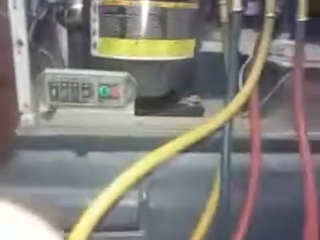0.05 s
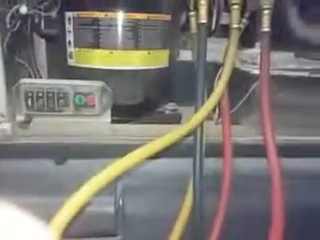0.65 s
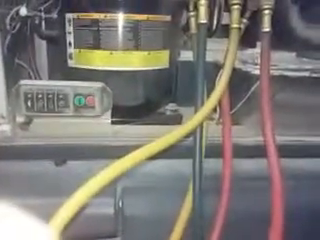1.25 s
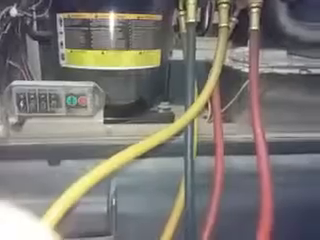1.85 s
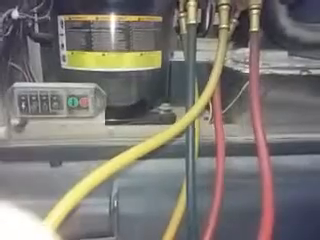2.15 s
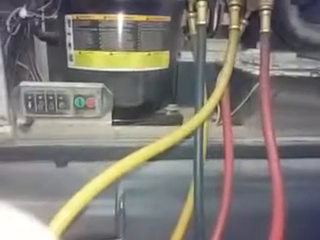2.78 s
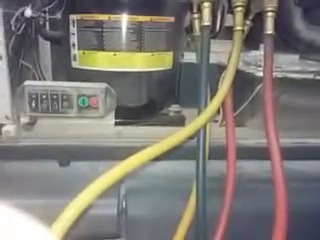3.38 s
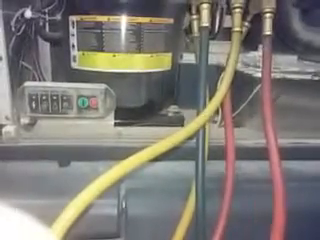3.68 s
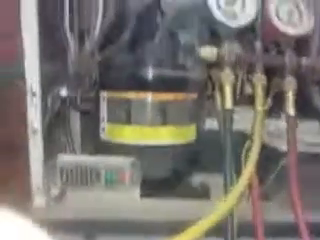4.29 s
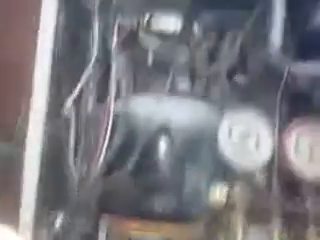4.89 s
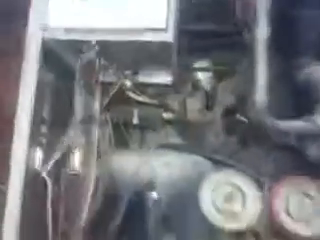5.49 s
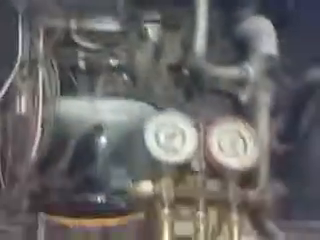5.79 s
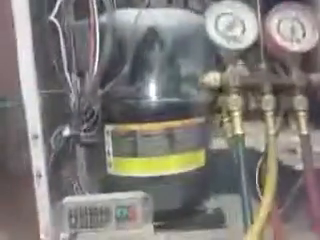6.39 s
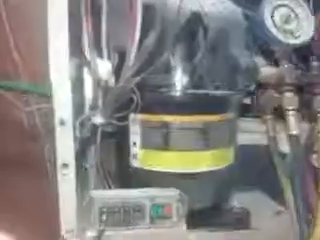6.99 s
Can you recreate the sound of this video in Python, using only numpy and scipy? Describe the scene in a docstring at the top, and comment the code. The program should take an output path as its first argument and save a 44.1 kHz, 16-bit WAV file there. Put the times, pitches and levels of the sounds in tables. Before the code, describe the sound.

A refrigeration compressor whines steadily over a humming, rushing fan, while gusts of air buffet the close microphone, hardest in the second half.

```python
"""A refrigeration unit runs with its service panel off, close to a hand-held microphone. From the start
the compressor whines on multiples of its shaft speed and the condenser fan hums and rushes. The
microphone drops from the top to the base by 0.6 s, and moving air buffets it. At 4.1 s it is lifted
to the top again: the gusts hit hardest and a limiter ducks under them. From 5 to 6 s the main whine
fades as the microphone points over the compressor; near 5.9 and 7.1 s an airy fan whistle swells."""
import sys
import numpy as np
from scipy import signal
from scipy.fft import rfft, irfft
from scipy.io import wavfile
from scipy.ndimage import uniform_filter1d, minimum_filter1d, map_coordinates

SR = 44100
rng = np.random.default_rng(int(sys.argv[2]) if len(sys.argv) > 2 else 0)


def store_pcm(level_fs):
    """Save levels as 16-bit WAV."""
    pcm = np.round(np.clip(level_fs, -1, 1) * 32767).astype(np.int16)
    wavfile.write(sys.argv[1], SR, np.atleast_2d(pcm).T)


N = 319725
TIME = np.arange(N) / SR
FREQS = np.maximum(np.fft.rfftfreq(N, 1 / SR), 1)
SHAFT_HZ, CUTOFF_HZ = 49.135, 15750


# Main whine, fading while the microphone points over the compressor: time_s, level_db
MAIN_WHINE = [(0, -42), (.6, -38), (2.2, -39.5), (4.4, -37), (5.1, -49), (6.1, -51), (6.4, -38.5),
              (6.85, -42), (7.25, -54)]
# Higher whines, each beamed its own way: shaft_order, base_db, top_db
HIGH_WHINES = [(60, -56, -44.5), (75, -47, -53), (77, -51, -53), (88, -50.5, -63)]
# Standing-wave crests the microphone crosses: time_s, shaft_order, rise_db
CRESTS = [(.35, 60, 6), (.5, 75, 9), (1.65, 77, 7), (2.85, 77, 7.5), (4.3, 60, 4), (4.65, 77, 12.5),
          (5.65, 60, 3.5), (5.75, 77, 8), (6.38, 77, 14), (7.05, 60, 4.5)]

def compressor_whine(turns, height, main_order=24, fade_db=1.1, crest_width_s=0.19):
    """The loudest shaft multiples; the level of each depends on where the microphone is."""
    out = from_db(in_time(MAIN_WHINE)) * tone(main_order * turns)
    for order, base_db, top_db in HIGH_WHINES:
        db = base_db + (top_db - base_db) * height + fade_db * drift(4.12)
        for time_s, crest_order, rise_db in CRESTS:
            if crest_order == order:
                db += rise_db * np.exp(-((TIME - time_s) / crest_width_s) ** 2)
        out += from_db(db) * tone(order * turns)
    return out


def shaft_turns(speed_wobble=0.0002915):
    """Running turn count of the compressor shaft, whose speed barely wavers under load."""
    return np.cumsum(SHAFT_HZ * (1 + speed_wobble * drift(4.904))) / SR


# Other clear shaft multiples: shaft_order, level_db
SHAFT_TONES = [(1, -55), (8, -48.5), (9, -44), (11, -54), (14, -54), (26, -51.5), (30, -73), (31, -49.5),
               (35, -55), (36, -69), (40, -55.5), (64, -73), (65, -50.5), (66, -50.5), (78, -55), (81, -57)]

def compressor_tones(turns, fade_db=2):
    """Quieter tones locked to the shaft, each fading in and out."""
    return sum(from_db(db + fade_db * drift(3.41)) * tone(order * turns) for order, db in SHAFT_TONES)


# Shell buzz, a dense comb of weak shaft multiples: frequency_hz, level_per_multiple_db
BUZZ_SPECTRUM = [(500, -69.5), (1400, -65), (2300, -77.5), (3300, -55.5), (4200, -66), (5200, -73.5),
                 (7600, -96), (8600, -82.5), (10200, -88.5), (11000, -91), (13300, -88), (14000, -102)]

def shell_buzz(turns, paths=4, turn_samples=8192):
    """The same rattle every turn, arriving by several paths whose shares shift as the hand moves."""
    orders = np.arange(1, CUTOFF_HZ // SHAFT_HZ)
    gains = gain_at(BUZZ_SPECTRUM, orders * SHAFT_HZ)
    out = np.zeros(N)
    for _ in range(paths):
        real, imag = rng.standard_normal((2, len(orders)))
        one_turn = irfft(np.r_[0, (real + 1j * imag) * gains], turn_samples) * turn_samples / 2
        out += drift(1.392) * np.interp(turns % 1 * turn_samples, np.arange(turn_samples), one_turn)
    return out / np.sqrt(paths)


# Fan and motor tones: pitch_hz, level_db
HUM_TONES = [(75.2, -36.5), (115, -38.5), (161.5, -36), (184.5, -41.5), (230.5, -41.5), (449, -49),
             (605, -53.5), (775, -60)]

def fan_hum(speed_wobble=0.00277, waver_db=4.0):
    """Low tones that waver in the uneven inflow."""
    clock_s = np.cumsum(1 + speed_wobble * drift(4)) / SR
    return sum(from_db(db + waver_db * drift(7)) * tone(hz * clock_s) for hz, db in HUM_TONES)


# Air through the coil: frequency_hz, density_db
RUSH_SPECTRUM = [(60, -57), (480, -60.5), (720, -64.5), (1050, -64), (1550, -66.5), (2350, -70),
                 (3250, -66), (4050, -71.5), (4600, -80), (5100, -84.5), (7700, -98.5), (9300, -98),
                 (11000, -101.5), (15700, -104)]
# Cabinet and pipe resonances: pitch_hz, width_hz, relative_db
CABINET_MODES = [(439, 20, -48), (500, 52, -41.5), (1006, 13, -45.5), (1068, 10, -40.5), (1290, 21, -48),
                 (1474, 19, -48.5), (2567, 18, -50.5), (5920, 250, -63), (8600, 250, -70),
                 (10250, 250, -74), (13300, 200, -77)]
# Fan whistle, heard only in some spots: time_s, level_db
WHISTLE_LEVEL = [(0, -44.5), (3.2, -48), (4.5, -57), (5.65, -44), (5.9, -34.5), (6.15, -46), (6.92, -46),
                 (7.07, -34), (7.25, -39)]

def air_rush(height, flicker_db=0.58, cabinet_db=-1, top_db=-1):
    """Air rushes through the coil, rings the cabinet (less near the top) and whistles at the fan."""
    rush = noise(RUSH_SPECTRUM) * from_db(flicker_db * drift(25))
    cabinet = sum(from_db(db) * resonance(hz, width_hz) for hz, width_hz, db in CABINET_MODES)
    whistle = from_db(in_time(WHISTLE_LEVEL)) * resonance(pitch_hz=1341, width_hz=8)
    return rush + cabinet * from_db(cabinet_db + top_db * height) + whistle


def panel_edge(direct, height, base_lag_s=0.00032, extra_lag_s=0.00039, base_share=0.27, dull_hz=6500):
    """The opening's edge adds an inverted echo; lifting delays and fades it, so notches sweep down."""
    dulled = irfft(rfft(direct) / (1 + (FREQS / dull_hz) ** 4), N)
    echo = np.interp(TIME - base_lag_s - extra_lag_s * height, TIME, dulled)
    return direct - base_share * (1 - height ** 4) * echo


# Buffeting rumble: frequency_hz, relative_db
BUFFET_SPECTRUM = [(12, -10), (25, -19), (45, -10.5), (75, 2.5), (130, 2), (190, -1), (270, -10.5),
                   (400, -21.5), (700, -32.5), (1500, -72)]
# Flutter of strong gusts: frequency_hz, relative_db
FLUTTER_SPECTRUM = [(100, 5.5), (200, -0.5), (305, 5.5), (390, -6.5), (520, -10), (680, -19), (1000, -35),
                    (2000, -73)]

def wind(draught_db=-29.5, flap_db=1.8, strong_db=-12, flutter_growth=1.53, flicker_db=2.5):
    """A flapping draught plus gusts; faster air brings smaller eddies, so flutter outgrows rumble."""
    wind_db = 10 * np.log10(from_db(draught_db) ** 2 + gust_power()) + flap_db * drift(60)
    buffet = from_db(wind_db) * steadied(noise(BUFFET_SPECTRUM), window_s=0.0244)
    flutter_db = -20.5 + flutter_growth * (wind_db - strong_db) + flicker_db * drift(70)
    return buffet + from_db(flutter_db) * rms_one(noise(FLUTTER_SPECTRUM))


# Gusts on the microphone port: start_s, span_s, relative_db
GUSTS = [(.076, 0, -24), (.29, .1, -22), (.486, 0, -24.5), (.55, 0, -16), (.925, 0, -20),
         (1.06, 0.052, -20), (1.351, 0, -15.5), (1.4, .045, -20.5), (2.31, 0.079, -20.5),
         (3.123, 0.047, -16.5), (3.337, 0, -21.5), (3.68, .1, -22), (3.92, 0.1, -21.5),
         (4.417, 0.043, -16.5), (4.578, 0, -20), (4.739, 0.13, -11), (4.955, 0.039, -12.5),
         (5.077, .08, -10.5), (5.189, .087, -9.5), (5.334, 0.068, -11), (5.466, 0, -15),
         (5.51, .045, -10.5), (5.628, 0, -4.5), (5.697, 0, -7.5), (5.755, 0.098, -16),
         (5.979, 0.085, -10.5), (6.144, 0.039, -11), (6.48, 0.048, -12), (6.654, 0, -10), (6.769, 0, -21.5),
         (6.903, .034, -15), (7.134, 0.044, -11), (7.243, 0, -8.5)]

def gust_power(trim_db=-1.34, gap_s=0.045, puff_s=0.028, jitter_s=0.0033, spread_db=0.55, max_puffs=6):
    """Each gust sheds one puff or a short, slightly uneven run of them."""
    power = np.zeros(N)
    for start_s, span_s, db in GUSTS:
        puff_times = np.linspace(start_s, start_s + span_s, 1 + round(span_s / gap_s))
        for time_s, (late, strong) in zip(puff_times, rng.standard_normal((max_puffs, 2))):
            offset = 2 * (TIME - time_s - jitter_s * late) / puff_s
            near = np.abs(offset) < 4
            power[near] += from_db(db + trim_db + spread_db * strong) ** 2 * np.exp(-offset[near] ** 2)
    return power


# Sharpest eddies, single thumps on the port: centre_s, relative_db, pitch_hz
EDDIES = [(.075, -7.5, 129), (1.061, -11.5, 110), (3.123, -17, 157), (3.151, -9, 181), (4.777, -3, 164),
          (5.185, 2, 148), (5.272, 0.5, 150), (5.288, -3.5, 284), (5.622, -4, 154), (5.693, -2, 254),
          (5.757, 2, 118), (6.903, -4, 129)]

def eddy_thumps(trim_db=-2):
    """A passing eddy pushes the diaphragm, then sucks it back."""
    out = np.zeros(N)
    for centre_s, db, pitch_hz in EDDIES:
        near = np.abs(TIME - centre_s) < 2 / pitch_hz
        phase = 2 * np.pi * pitch_hz * (TIME[near] - centre_s)
        out[near] -= from_db(db + trim_db) * phase * np.exp((1 - phase ** 2) / 2)
    return out


def limiter(x, threshold_db=-2.0, slope=0.7, release_db_per_s=49, attack_s=0.0042):
    """Peaks over the threshold pull the gain down at once; it then climbs back."""
    over_db = np.maximum(20 * np.log10(np.abs(x) + 1e-9) - threshold_db, 0)
    release_db = release_db_per_s * TIME
    cut_db = np.maximum.accumulate(slope * over_db + release_db) - release_db
    span = int(attack_s * SR)
    return x * from_db(uniform_filter1d(minimum_filter1d(-cut_db, span), span))


def from_db(db):
    """Decibels to gain."""
    return 10 ** (np.asarray(db) / 20)


def rms_one(x):
    """Scale to unit power."""
    return x / np.sqrt(np.mean(x ** 2) + 1e-20)


def in_time(points):
    """A (time_s, value) curve at every sample."""
    return np.interp(TIME, *np.transpose(points))


def gain_at(spectrum, hz):
    """Gain of a spectrum, read on a log-frequency axis."""
    knots_hz, level_db = np.transpose(spectrum)
    return from_db(np.interp(np.log(hz), np.log(knots_hz), level_db))


def drift(rate_hz):
    """Smooth random curve of spread about 1, with rate_hz new values a second."""
    steps = rng.standard_normal(4096)
    coarse = map_coordinates(steps, [TIME[::64] * rate_hz], order=3, mode="wrap")
    return np.interp(TIME, TIME[::64], coarse)


def tone(cycles):
    """Unit-power sine with a random starting phase."""
    return np.sqrt(2) * np.sin(2 * np.pi * (cycles + rng.random()))


def noise(spectrum):
    """Noise with the given power per Hz."""
    return irfft(rfft(rng.standard_normal(N)) * gain_at(spectrum, FREQS), N) * np.sqrt(SR / 2)


def resonance(pitch_hz, width_hz):
    """Turbulence ringing in one resonance; unit power."""
    radius = np.exp(-np.pi * width_hz / SR)
    feedback = [1, -2 * radius * np.cos(2 * np.pi * pitch_hz / SR), radius ** 2]
    return rms_one(signal.lfilter([1, 0, -1], feedback, rng.standard_normal(N)))


def steadied(x, window_s):
    """Even out a noise's slow swells to unit power; keep its fast lumps."""
    return x / np.sqrt(uniform_filter1d(x ** 2, int(window_s * SR)) + 1e-12)


# Microphone path: time_s, height (0 base, 1 top)
MIC_HEIGHT = [(0, 1), (.3, 0.59), (.6, 0.085), (4.1, 0.032), (4.27, 0.48), (4.5, .93), (7.25, 0.94)]

def scene():
    """The machine in its cabinet, and the wind on the microphone."""
    turns = shaft_turns()
    height = in_time(MIC_HEIGHT)
    interior = compressor_tones(turns) + shell_buzz(turns) + air_rush(height)
    machine = panel_edge(interior, height) + compressor_whine(turns, height) + fan_hum()
    return (machine + wind() + eddy_thumps())[None]


def record(dry):
    """The limiter rides the gusts; a steep low-pass cuts the highest treble."""
    lowpass = signal.ellip(12, 0.1, 80, CUTOFF_HZ, fs=SR, output="sos")
    return signal.sosfilt(lowpass, limiter(dry[0]))[None]


dry = scene()
out = record(dry)
store_pcm(out)
```